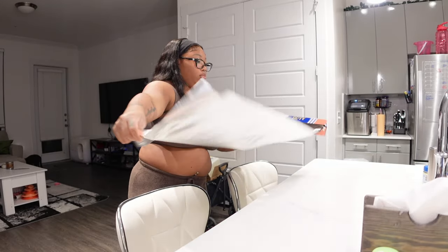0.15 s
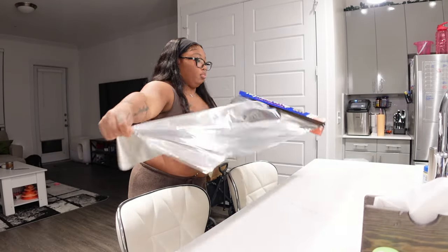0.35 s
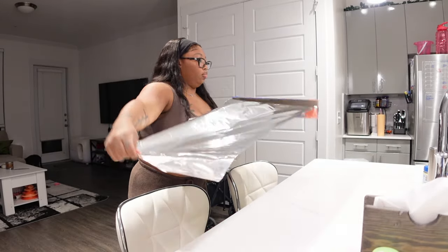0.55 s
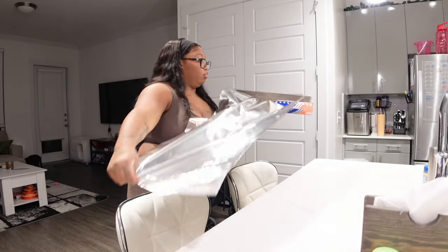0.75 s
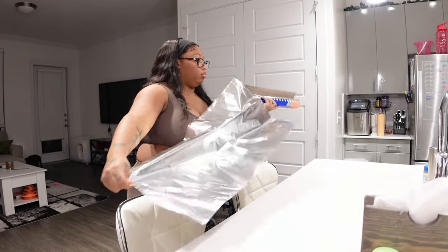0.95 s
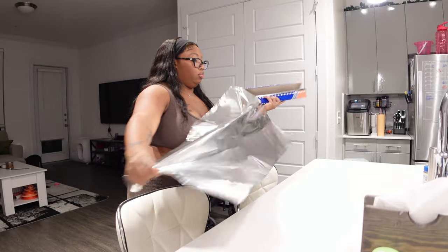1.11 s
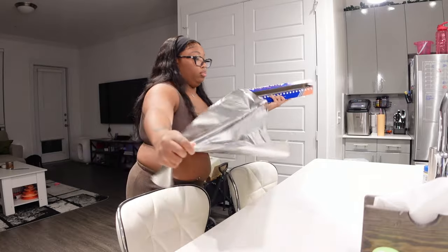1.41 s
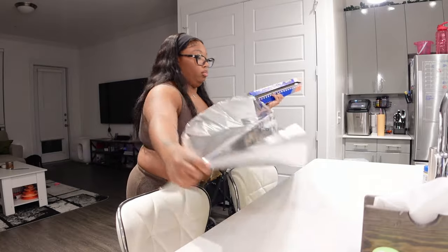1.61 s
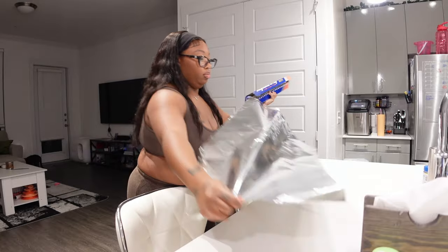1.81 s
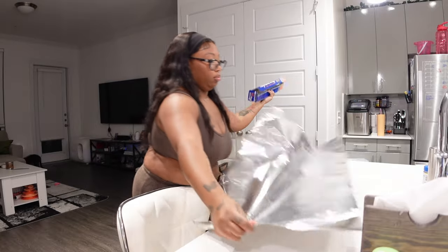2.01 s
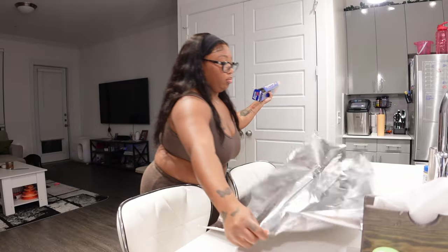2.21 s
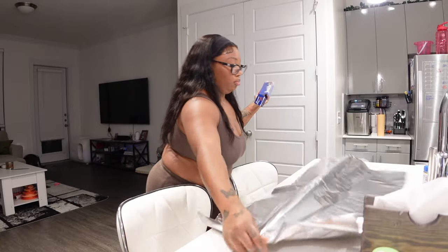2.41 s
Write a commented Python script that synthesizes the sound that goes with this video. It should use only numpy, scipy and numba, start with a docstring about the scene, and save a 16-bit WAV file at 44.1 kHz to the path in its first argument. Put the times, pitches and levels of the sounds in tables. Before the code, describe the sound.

Aluminum foil crinkles and rustles as a long sheet is pulled out and laid down.

```python
"""A long sheet of aluminium foil is pulled from its box and laid on a kitchen counter.
Over a low room tone, the first tugs set off swarms of tiny buckling clicks: crisp creases,
crinkling facets and flapping panels. From 0.6 s, as the sheet lengthens, patches flex with a
hollow ring, the wider ones on lower notes. After 2 s the handling thins to a few light touches.
Throughout, a bright, hard-walled room smears the clicks into a rustle."""
import sys
import numpy as np
from scipy import signal
from scipy.fft import rfft, irfft
from scipy.io import wavfile
from numba import njit

SR = 44100
rng = np.random.default_rng(int(sys.argv[2]) if len(sys.argv) > 2 else 0)


def materialize(psi):
    """Save the field psi as 16-bit PCM at rate SR to the path in sys.argv[1].

    A 1-D psi becomes a single channel; in a 2-D psi each row is a channel.
    """
    bounded = np.clip(np.atleast_2d(psi).T, -1, 1)
    quanta = np.round(bounded * 32767).astype(np.int16)
    wavfile.write(sys.argv[1], SR, quanta)


N = 112454


def undb(db):
    """Decibels to linear gain."""
    return 10 ** (np.asarray(db) / 20)


def unit(x):
    """Scale to rms 1."""
    return x / np.sqrt(np.mean(x ** 2) + 1e-18)


def colour(x, curve):
    """Minimum-phase EQ through (f/Hz, level/dB) points; the result has rms 1."""
    hz, db = np.array(curve, float).T
    size = 8192
    f = np.maximum(np.fft.rfftfreq(size, 1 / SR), 1)
    gain = undb(np.interp(np.log(f), np.log(hz), db))
    cepstrum = irfft(np.log(gain))
    cepstrum[1:size // 2] *= 2  # folded forward, so nothing rings ahead of a click
    cepstrum[size // 2 + 1:] = 0
    impulse = irfft(np.exp(rfft(cepstrum)))
    return unit(signal.fftconvolve(x, impulse)[:N])


@njit
def resonate(x, hz, width):
    """State-variable band-pass; width is the bandwidth as a fraction of hz."""
    y, band_state, low_state = np.empty(len(x)), 0., 0.
    g = np.tan(np.pi * hz / SR)
    for i in range(len(x)):
        band = (band_state + g * (x[i] - low_state)) / (1 + g * (g + width))
        band_state = 2 * band - band_state
        low_state += 2 * g * band
        y[i] = width * band
    return y


def clicks(per_s, spread_db):
    """Buckling snaps at random moments, of either polarity and uneven size."""
    fires = rng.random(N) < per_s / SR
    size = undb(spread_db * np.minimum(rng.standard_normal(N), 2))
    polarity = rng.choice([-1, 1], N)
    return unit(fires * polarity * size)


def room_tone():
    """A faint, steady bed of low rumble."""
    # EQ of the rumble: f/Hz, level/dB
    rumble_eq = [(12, -26), (27, 5.5), (42, -19), (70, -19.5), (130, -12), (350, -7.5), (1000, -56.5),
                 (8000, -52)]
    return undb(-47.5) * colour(rng.standard_normal(N), rumble_eq)


def room(x):
    """Dense reflections from hard walls; the air takes the highest treble first."""
    # reverb decay by band: low edge/Hz, high edge/Hz, t60/s
    decay_bands = [(77, 1306, 0.58), (1160, 5430, 0.72), (4630, 10280, 0.69), (9600, 15700, 0.47)]
    wet, predelay_s = undb(-1.5), .004
    t = np.arange(SR // 2) / SR
    tail = 0
    for low, high, t60 in decay_bands:
        bandpass = signal.butter(3, [low, high], "band", fs=SR, output="sos")
        noise = signal.sosfilt(bandpass, rng.standard_normal(len(t)))
        tail = tail + noise * np.exp(-np.log(1000) * t / t60) * (t > predelay_s)
    reverb = signal.fftconvolve(x, tail / np.linalg.norm(tail))[:N]
    return (x + wet * reverb) / np.hypot(1, wet)


def flexing(t):
    """Snaps ring a patch of foil while it bends; the larger the patch, the lower its hollow note."""
    # flexing patches: start/s, length/s, f/Hz, level/dB
    patches = [ (0.642, 0.062, 312, -36.5), (0.655, 0.048, 1090, -26.5), (0.718, 0.094, 4270, -23),
               (0.723, 0.026, 1780, -18.5), (0.754, 0.033, 1250, -22), (0.81, 0.037, 820, -27),
               (0.851, .14, 424, -27), (0.857, 0.129, 757, -23.5), (0.856, 0.11, 1420, -22),
               (0.926, 0.11, 267, -31.5), (0.996, 0.063, 244, -37.5), (1.479, 0.068, 347, -33),
               (1.59, 0.047, 356, -33), (1.974, 0.029, 660, -27.5), (2.12, .05, 1170, -32.5),
               (2.233, .075, 990, -36), (2.32, 0.15, 900, -40), ]
    width = 0.35
    snaps = clicks(per_s=1200, spread_db=-3)
    out = 0
    for start, length, hz, db in patches:
        ring = resonate(snaps, float(hz), width)
        ring = resonate(ring, float(hz), width)  # second pass for steeper skirts
        progress = np.clip((t - start) / length, 0, 1)
        swell = np.sqrt(4 * progress * (1 - progress))
        out = out + undb(db) * unit(ring) * swell
    return out


def tugs(t):
    """Envelopes of creases, facets and panels: each movement rises, holds and dies away."""
    # movements of the sheet: start/s, rise/s, hold/s, release/s, creases/dB, facets/dB, panels/dB
    moves = [ (0.0, 0.0017, .04, 0.013, -26.5, -23.5, -36), (0.073, 0.021, 0.2, 0.018, -33, -23.5, -38),
             (0.265, 0.05, 0.068, 0.029, -17.5, -18, -34), (0.423, 0.017, 0.042, 0.013, -30, -22.5, -41),
             (0.528, .006, 0.056, 0.025, -19.5, -19.5, -38), (0.614, 0.048, 0.021, 0.028, -21, -14, -30),
             (0.707, 0.019, 0.082, .025, -17.5, -16.5, -35),
             (0.818, 0.03, 0.22, 0.061, -17.5, -17.5, -31.5), (1.184, .02, 0.044, .025, -26.5, -25.5, -37),
             (1.311, 0.0092, 0.037, 0.017, -22, -23, -39), (1.381, 0.06, 0.043, 0.054, -17, -17, -25.5),
             (1.48, 0.05, 0.16, 0.05, -16, -19, -29.5), (1.727, 0.038, 0.026, 0.038, -27, -25, -35),
             (1.79, 0.011, 0.025, 0.017, -15.5, -19, -32.5), (1.828, 0.0088, 0.047, 0.09, -24, -21, -31.5),
             (1.957, 0.021, 0.013, .016, -18, -17.5, -25.5), (2.03, 0.014, 0.01, 0.01, -25, -26, -34),
             (2.106, 0.024, 0.036, .015, -24.5, -21.5, -52),
             (2.221, 0.013, 0.022, 0.041, -18, -17.5, -35.5), (2.296, .02, 0.041, .03, -25, -25.5, -41.5),
             (2.418, 0.019, 0.017, 0.011, -33, -24, -37.5), (2.50, .012, 0.015, .02, -29, -27, -45), ]
    power = 0
    for start, rise, hold, release, *levels_db in moves:
        attack = np.clip((t - start) / rise, 0, 1)
        decay = np.exp(-np.maximum(t - start - rise - hold, 0) / release)
        power = power + (undb(levels_db)[:, None] * attack * decay) ** 2
    return np.sqrt(power)


def crease_runs(t):
    """Quick random swings of gain as one crease sets off its neighbours."""
    knots_per_s, depth_db = 45.03, 2.5
    knots = rng.standard_normal(1000)
    swing = np.interp(t * knots_per_s, np.arange(len(knots)), knots)
    return unit(undb(depth_db * swing))


def crinkle(t, crease_env, facet_env, panel_env):
    """Foil buckles in three swarms of clicks, from the smallest creases to whole panels."""
    # EQ of crisp creases, mid-range facets and low, papery panels: f/Hz, level/dB
    crease_eq = [(1000, -18), (2500, -24), (5000, -0.5), (6200, -1), (7500, 5), (8500, 7.5), (9500, 0),
                 (10800, -3), (13300, -1), (15800, -6)]
    facet_eq = [(70, -30), (200, -20), (500, -15.5), (1000, -6), (2600, 2), (3500, 1.5), (4800, 1),
                (6200, -2.5), (8500, -2), (10000, -15), (13000, -12.5), (15800, -33)]
    panel_eq = [(60, -33), (120, -5), (190, -8.5), (260, -0.5), (400, 2), (650, 5), (1100, 6), (2200, -5),
                (5000, -17.5)]
    restless_env = np.hypot(facet_env, undb(-28))  # the sheet never quite rests
    creases = crease_env * colour(clicks(per_s=1100, spread_db=2), crease_eq)
    facets = restless_env * colour(clicks(per_s=1500, spread_db=2.5), facet_eq)
    crackle = crease_runs(t) * (creases + facets)
    panels = panel_env * colour(clicks(per_s=400, spread_db=5.5), panel_eq)
    return crackle + panels


def sheet(t, parts):
    """Several parts of the sheet crinkle on their own, each with its own path through the room."""
    envelopes = tugs(t)
    return sum(room(crinkle(t, *envelopes)) for _ in range(parts)) / np.sqrt(parts)


def scene():
    """The foil in the kitchen over a low room tone, in mono."""
    t = np.arange(N) / SR
    return (sheet(t, parts=4) + room(flexing(t)) + room_tone())[None]


def record(dry):
    """Soft saturation rounds the highest peaks, then a steep low-pass cuts the top."""
    ceiling, top_hz = 1.1, 15620
    lowpass = signal.ellip(12, .1, 90, top_hz, fs=SR, output="sos")
    return signal.sosfilt(lowpass, ceiling * np.tanh(dry / ceiling))


dry = scene()
out = record(dry)
materialize(out)
```